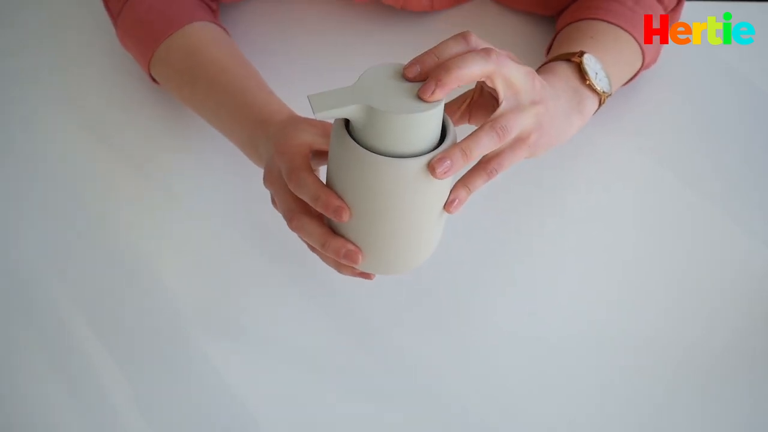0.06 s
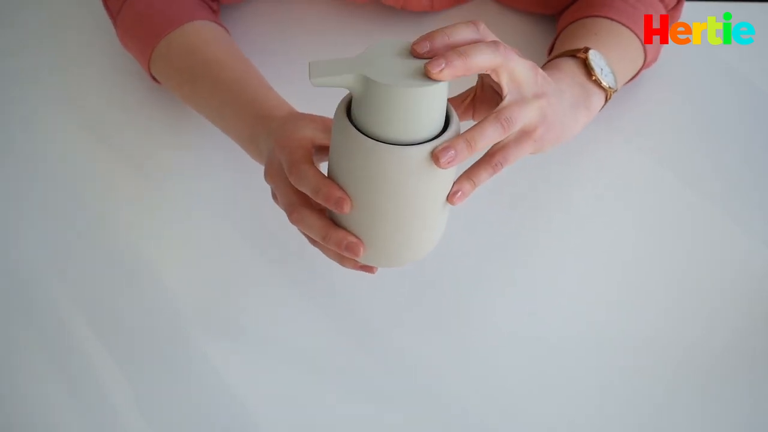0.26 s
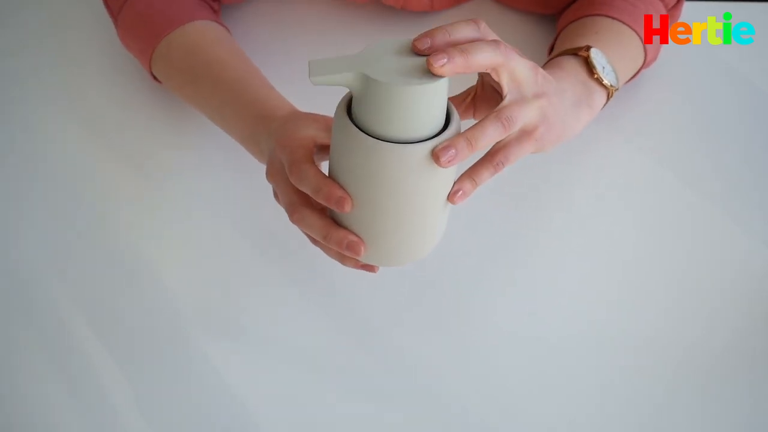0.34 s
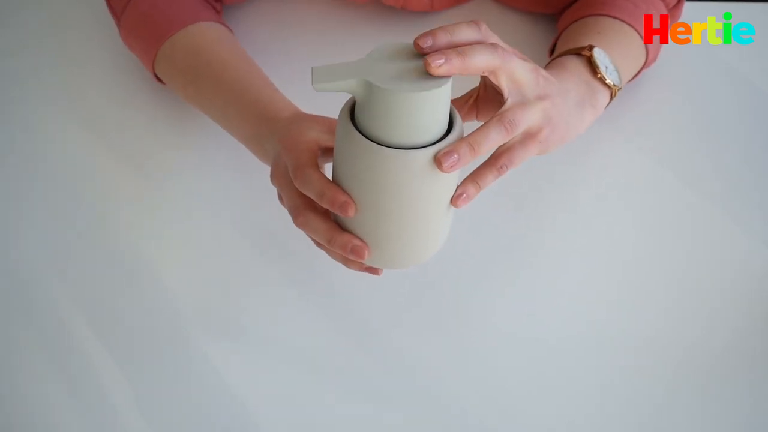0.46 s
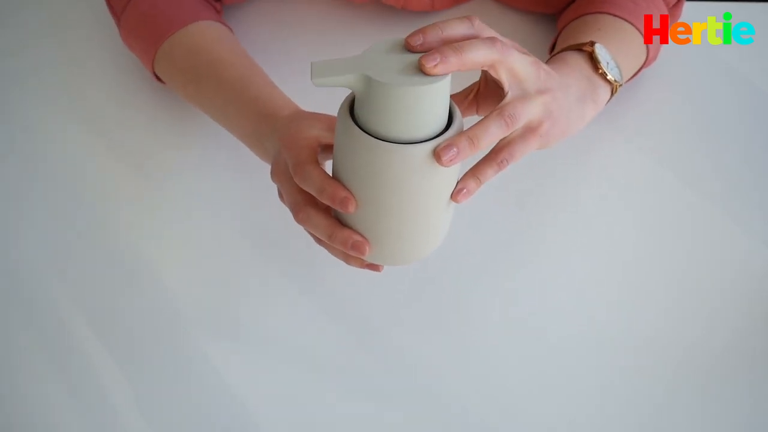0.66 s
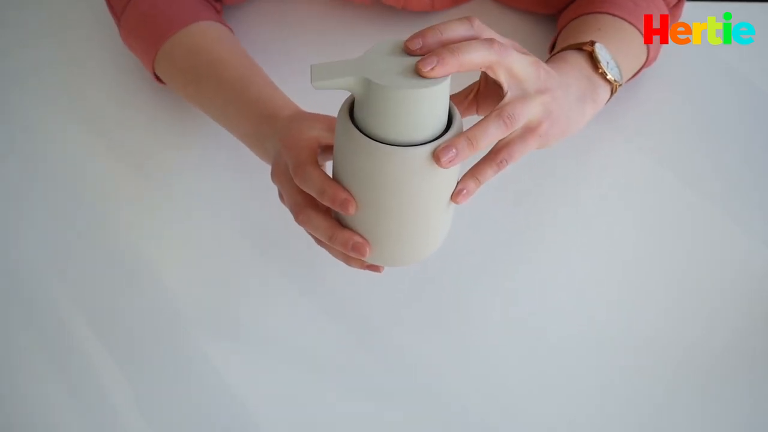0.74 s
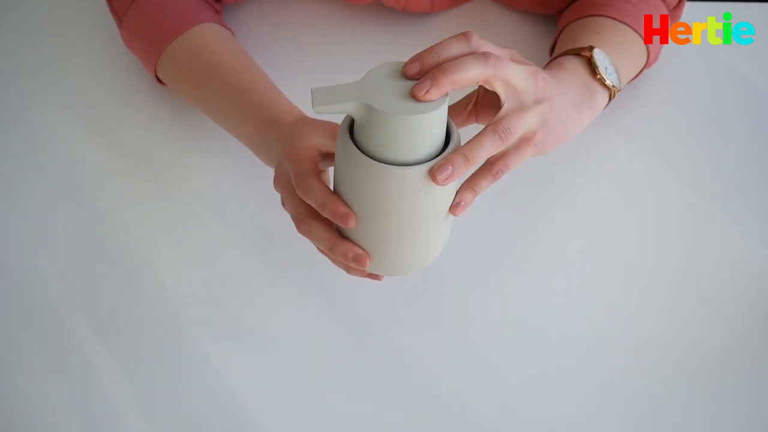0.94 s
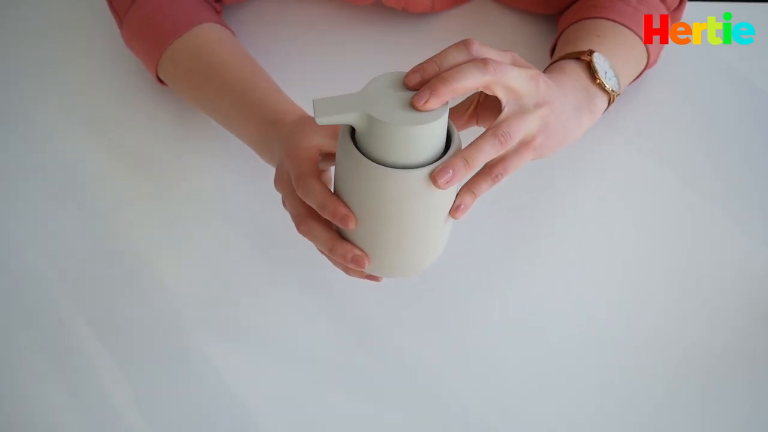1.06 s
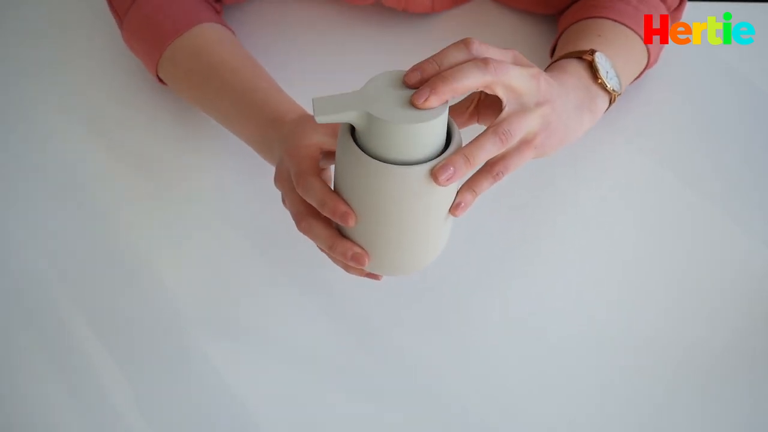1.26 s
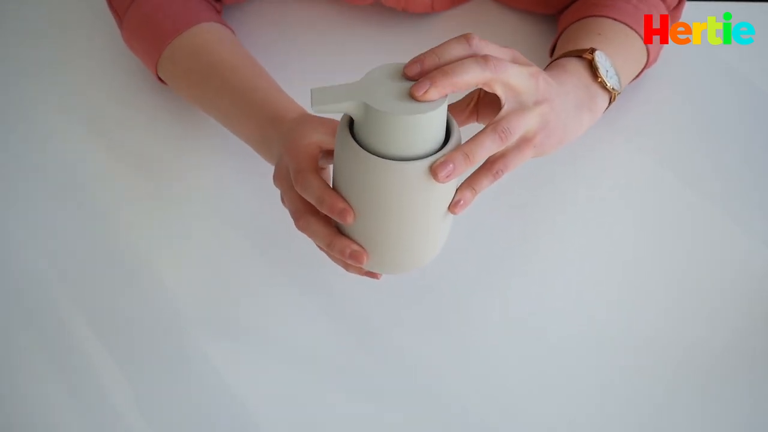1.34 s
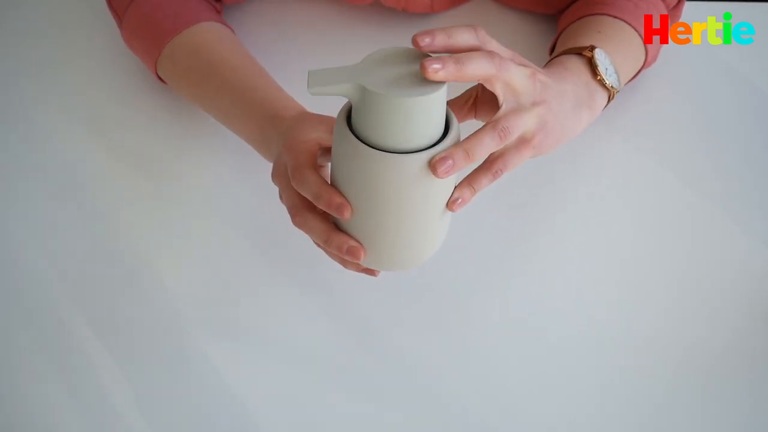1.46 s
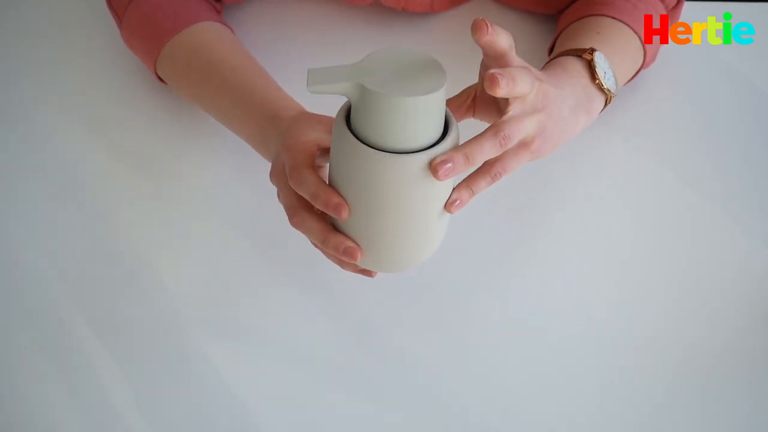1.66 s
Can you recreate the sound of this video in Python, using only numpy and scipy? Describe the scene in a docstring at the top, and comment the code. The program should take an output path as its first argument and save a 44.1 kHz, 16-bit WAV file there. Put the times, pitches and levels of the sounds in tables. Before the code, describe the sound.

A soap dispenser pump slides up with a faint squeak and clacks sharply. It is pressed down again, rubbing and bumping softly on the table, then springs back with a second clack, close up in a quiet room.

```python
"""A soap dispenser on a table in a quiet room, close to a single microphone. Over faint hiss and the
rumble of the hand, a press dies away. The plastic head rubs and squeaks up its collar, the hollow under
it rising in pitch, until the spring throws it against its stop with a sharp clack at 0.24 s. Near 0.9 s
it is pressed down again, rubbing, while the hand bumps the dispenser softly on the table. It lifts and
clacks once more at 1.39 s, and the room answers."""
import sys
import numpy as np
from scipy import signal
from scipy.fft import rfft, irfft, next_fast_len
from scipy.io import wavfile

SR = 44100
rng = np.random.default_rng(int(sys.argv[2]) if len(sys.argv) > 2 else 0)


def materialize(psi):
    """Save the field psi as 16-bit PCM at rate SR to the path in sys.argv[1].

    A 1-D psi becomes a single channel; in a 2-D psi each row is a channel.
    """
    bounded = np.clip(np.atleast_2d(psi).T, -1, 1)
    quanta = np.round(bounded * 32767).astype(np.int16)
    wavfile.write(sys.argv[1], SR, quanta)


N = 74970
T = np.arange(N) / SR
SIZE = next_fast_len(2 * N)
HZ = np.fft.rfftfreq(SIZE, 1 / SR)


def amp(db):
    """Decibels to gain."""
    return 10 ** (np.asarray(db) / 20)


def unit(x):
    """Scale to rms 1."""
    return x / np.sqrt(np.mean(x ** 2) + 1e-20)


def along(points, hz):
    """Read (Hz, value) points on a log axis."""
    freqs, values = np.transpose(points)
    return np.interp(np.log(hz + 1), np.log(freqs + 1), values)


def level(rows, release_s=.0006):
    """Gain per sample from (s, dB) rows, falling 20 dB per release_s after the last."""
    s, db = np.transpose(rows)
    return amp(np.interp(T, s, db) - 20 * np.maximum(T - s[-1], 0) / release_s) * (T >= s[0])


def filtered(x, response):
    """x through a frequency response."""
    return irfft(rfft(x, SIZE) * response, SIZE)[:N]


def noise(spectrum):
    """Noise of rms 1, coloured by (Hz, dB) points."""
    return unit(filtered(rng.standard_normal(N), amp(along(spectrum, HZ))))


def impulse(db):
    """The causal click that has this spectrum."""
    cepstrum = irfft(np.log(amp(db)), SIZE)
    cepstrum[1:SIZE // 2] *= 2
    cepstrum[SIZE // 2 + 1:] = 0
    return irfft(np.exp(rfft(cepstrum)), SIZE)[:N]


def ring(modes, attack_s):
    """Damped sines that start together."""
    sines = sum(amp(db - 60 * T / t60) * np.sin(2 * np.pi * hz * T) for hz, db, t60 in modes)
    return (1 - np.exp(-T / attack_s)) * sines


def at(s, x):
    """x, starting s seconds later."""
    return np.pad(x, (max(round(s * SR), 0), 0))[:N]


# The quiet behind the dispenser. Each row: frequency in Hz, relative level in dB.
FLOOR_SPECTRUM = [(20, 24), (80, 21), (250, 12.5), (500, 7), (1000, 1), (3000, -4), (8000, -7.5),
                  (15000, -7.5)]

def noise_floor(level_db=-66):
    """Faint steady hiss, strongest in the bass."""
    return amp(level_db) * noise(FLOOR_SPECTRUM)


# The hand near the microphone, holding and shifting its grip. Each row: time in seconds, level in dB.
HOLD_LEVELS = [(0, -67), (0.4, -67), (0.6, -64.5), (0.85, -71.5), (1.0, -57), (1.15, -59.5), (1.27, -70.5),
               (1.7, -62)]
GRIP_LEVELS = [(0.42, -72), (0.48, -62), (0.62, -56), (0.68, -75.5)]
# Colour of the holding hand's rumble. Each row: frequency in Hz, relative level in dB.
HOLD_SPECTRUM = [(20, -3), (45, -9.5), (70, -3), (90, -1.5), (122, 1.5), (148, -4.5), (188, 3), (260, -12),
                 (315, -5.5), (500, -22), (1000, -32.5), (3000, -52.5)]

def handling():
    """The hand rumbles on the dispenser, deeper as it shifts its grip."""
    hold = level(HOLD_LEVELS) * noise(HOLD_SPECTRUM)
    grip = level(GRIP_LEVELS) * noise([(15, 5.5), (32, -2.5), (60, 1), (150, -36), (1000, -80)])
    return hold + grip


# The hollow under the head, low when pressed. Each row: time in seconds, pitch in Hz.
HOLLOW_PITCH = [(0, 898), (0.17, 879.3), (0.2, 917), (0.238, 1123), (0.89, 1130), (0.98, 1089), (1.06, 980),
                (1.13, 870), (1.35, 910), (1.375, 930), (1.394, 1078)]
HOLLOW_LOWPASS = 1 / (1 + (HZ / 1800) ** 4)

def hollow(x, width_hz=58):
    """x through the resonance under the head, which follows the head's height."""
    pitch_hz = np.interp(T, *np.transpose(HOLLOW_PITCH))
    turn = np.exp(2j * np.pi * np.cumsum(pitch_hz) / SR)
    pole = np.exp(-np.pi * width_hz / SR)
    return (signal.lfilter([1], [1, -pole], x / turn) * turn).real


# The head's four strokes, heard close up. Each row: time in seconds, relative level in dB.
PRESS_1 = [(0, -71.5), (0.03, -74), (0.06, -90)]
RISE_1 = [(0.168, -78), (0.181, -55), (0.19, -49.5), (0.2, -49.5), (0.209, -55), (0.217, -42), (0.223, -43),
          (0.229, -45), (0.238, -46.5)]
PRESS_2 = [(0.875, -79), (0.895, -49.5), (0.913, -66.5), (0.943, -55.5), (0.957, -68), (0.971, -50),
           (0.987, -64), (1.001, -54), (1.009, -60), (1.041, -52), (1.071, -60), (1.125, -60.5),
           (1.16, -86)]
RISE_2 = [(1.318, -79), (1.333, -47.5), (1.341, -50.5), (1.352, -54.5), (1.36, -68.5), (1.366, -45.5),
          (1.377, -40.5), (1.388, -42), (1.394, -44.5)]
# Colour of the rubbing, down and up. Each row: frequency in Hz, relative level in dB.
PRESS_SPECTRUM = [(200, -11.5), (700, -8.5), (1380, 5.5), (1680, -5.5), (2100, -1), (2600, -3.5), (3250, 6),
                  (3800, -5.5), (4700, 0.5), (5600, 2), (7200, -2.5), (8400, -15), (10000, -11.5),
                  (13500, -19), (15500, -22.5)]
RISE_SPECTRUM = [(200, -17), (600, -11), (1350, -0.5), (1700, -6.5), (2500, -4.5), (3050, 4), (3700, -1.5),
                 (4800, 0.5), (5700, -3), (7000, -2), (8300, -12.5), (10000, -10), (13500, -15.5),
                 (15500, -23)]
# The collar's resonances on the way up. Each row: centre in Hz, width in Hz, boost in dB.
COLLAR_PEAKS = [(3010, 270, 4), (3245, 360, 4), (5600, 200, 11), (6200, 390, 6.5), (6340, 200, 5.5)]

def rubbing(slips_per_s=12000, spread=.22):
    """Dense tiny slips hiss in the collar and sound the hollow, which is more damped on the way down."""
    slips = (rng.random(N) < slips_per_s / SR) * rng.standard_normal(N)
    slips *= np.exp(spread * rng.standard_normal(N))
    press = level(PRESS_1) + level(PRESS_2)
    rise = level(RISE_1, release_s=.008) + level(RISE_2, release_s=.008)
    collar_db = sum(db / (1 + (2 * (HZ - hz) / width) ** 2) for hz, width, db in COLLAR_PEAKS)
    hiss = press * unit(filtered(slips, amp(along(PRESS_SPECTRUM, HZ))))
    hiss += rise * unit(filtered(slips, amp(along(RISE_SPECTRUM, HZ) + collar_db)))
    tone = amp(-2.5) * press * unit(hollow(slips, width_hz=125))
    tone += amp(.5) * rise * unit(hollow(slips))
    return amp(-2) * hiss + filtered(tone, HOLLOW_LOWPASS)


# Bumps on the table. Each row: start in seconds, relative level in dB, half the low-pass corner in Hz.
BUMPS = [(0.189, -48, 307), (0.417, -32, 153), (0.906, -33.5, 516), (0.9159, -34, 337), (0.956, -38.5, 406),
         (1.337, -49.5, 403), (1.361, -53.5, 150)]
# The room's low boom after each bump.
# Each row: frequency in Hz, relative level in dB, seconds to fall 60 dB.
BOOM_MODES = [(97, -5, .19), (118, 2.5, .17), (190.5, -4, 0.17), (212.7, -3, 0.23), (292.5, -4.5, 0.19),
              (314.5, -7.5, 0.15), (347, -9, .18), (473.6, -10, 0.14), (560, -14.5, 0.15)]
# The dull thud of contact. Each row: frequency in Hz, relative level in dB.
THUD_SPECTRUM = [(30, -25.5), (60, -14), (110, -1.5), (700, 0), (2000, -13), (8000, -29)]

def bumps(thud_db=-9, thud_t60_s=.08):
    """The hand knocks the dispenser softly and a low boom follows."""
    boom = ring(BOOM_MODES, attack_s=.006)
    out = np.zeros(N)
    for s, db, half_corner_hz in BUMPS:
        thud = amp(thud_db - 60 * T / thud_t60_s) * noise(THUD_SPECTRUM)
        softening = 1 / (1 + 1j * HZ / (2 * half_corner_hz)) ** 2
        out += at(s, amp(db) * filtered(boom + thud, softening))
    return out


# Squeaks, faint even this close. Each row: start in seconds, length in seconds.
SQUEAKS = [(0.19, .04), (1.338, 0.03)]

def squeaks(pitch_hz=2960, half_width_hz=70, level_db=-54.5):
    """The collar sings a thin note as the head starts to slide up."""
    band = 1 / (1 + ((HZ - pitch_hz) / half_width_hz) ** 2)
    note = unit(filtered(rng.standard_normal(N), band))
    swells = sum(np.sin(np.pi * np.clip((T - s) / length, 0, 1)) for s, length in SQUEAKS)
    return amp(level_db) * note * swells


# Catches in the collar, and the head settling against its stop just after the second clack. Each row: start in
# seconds, kick to the hollow in dB, snap level in dB.
TICKS = [(0.194, -32, -53.5), (0.2166, -36, -46), (0.894, -61.5, -49), (0.897, -38, -49),
         (0.972, -42.5, -49), (1.277, -92, -54.5), (1.342, -30.5, -59), (1.381, -31, -33.5),
         (1.41, -55, -31), (1.421, -47, -34.5)]
# The plastic's snap, in ticks and clacks alike. Each row: frequency in Hz, relative level in dB.
SNAP_SPECTRUM = [(300, -13), (1500, -8.5), (2500, -3), (3500, 1.5), (4800, -3.5), (6000, -4), (8500, -17.5),
                 (14000, -21.5), (16000, -36.5)]

def ticks(snap_t60_s=.016):
    """The head catches or settles lightly: a small snap and a ping of the hollow."""
    kicks = sum(at(s, amp(db) * (T == 0)) for s, db, _ in TICKS)
    onset = 1 - np.exp(-T / .001)
    snaps = sum(at(s, onset * amp(db - 60 * T / snap_t60_s) * noise(SNAP_SPECTRUM)) for s, _, db in TICKS)
    return filtered(hollow(kicks), HOLLOW_LOWPASS) + snaps


# The loudest sounds at the microphone. Each row: start in seconds, gain in dB, treble gain in dB.
CLACKS = [(0.2381, 1, -5), (1.3945, 1, -6)]
# The head's ring, and the spring's long, faintly beating one.
# Each row: frequency in Hz, relative level in dB, seconds to fall 60 dB.
HEAD_MODES = [(420, -30.5, 0.016), (1135, -2.5, 0.022), (1324.5, -8.5, .022), (1401, -26.5, 0.045),
              (1893, -53, 0.41), (3132, -36.5, .05), (3350, -53.5, .36), (4345, -56.5, .25),
              (5640, -45, .025)]
SPRING_MODES = [(1153, -36, .68), (1185, -42, .6)]
# The click of plastic on plastic. Each row: frequency in Hz, relative level in dB.
CLICK_SPECTRUM = [(40, -7.5), (150, 2), (280, 9.5), (420, 0.5), (1700, -4), (2400, 8), (3150, 9), (4100, 6),
                  (5000, -10.5), (6500, 0.5), (8200, -20.5), (14000, -24.5), (16000, -45.5)]

def clacks(knock_hz=1022.8, knock_peak_s=.0012, steepness=7.62, crack_t60_s=.02):
    """The head slams into its stop: a two-cycle knock, a click and a crack, then head and spring ring."""
    age = T / knock_peak_s
    knock = amp(-.5) * (age * np.exp(1 - age)) ** steepness * np.sin(2 * np.pi * knock_hz * T)
    body = -knock - ring([*HEAD_MODES, *SPRING_MODES], attack_s=.0005)
    click = impulse(along(CLICK_SPECTRUM, HZ))
    out = np.zeros(N)
    for s, db, treble_db in CLACKS:
        crack = amp(-21.5 - 60 * T / crack_t60_s) * noise(SNAP_SPECTRUM)
        treble = amp(treble_db) * at(.0005, click + crack)
        out += amp(db) * at(s, body + treble)
    return out


# The room's decay around the table. Each row: frequency in Hz, seconds to fall 60 dB.
ROOM_T60 = [(100, 0.54), (400, .55), (1100, 0.47), (2200, 0.6), (3600, .52), (6000, 0.41), (12000, 0.21)]
# Colour of that decay. Each row: frequency in Hz, relative level in dB.
ROOM_COLOUR = [(100, 1), (280, 9.5), (390, 4), (550, -9), (850, -8.5), (1130, 1.5), (1450, -8.5),
               (1900, -6), (2200, -14.5), (2700, -9), (3300, 0.5), (4200, 0.5), (6000, -5.5), (12000, -4.5)]
# Wall echoes reaching the microphone. Each row: delay in seconds, gain of the lows in dB.
WALL_ECHOES = [(.0037, -19.5), (.0205, -25.5), (0.061, -27.5), (.089, -31.5)]

def room(x, tail_db=-13, echo_corner_hz=2500):
    """The room answers with a few dull echoes and a diffuse tail in which the high treble dies first."""
    hz, t, bands = signal.stft(rng.standard_normal(SR), SR, nperseg=256)
    decay = amp(-60 * t / along(ROOM_T60, hz)[:, None])
    tail = signal.istft(bands * decay, SR, nperseg=256)[1][:SR]
    tail *= 1 - np.exp(-T[:SR] / .005)
    diffuse = signal.fftconvolve(x, tail / np.linalg.norm(tail))[:N]
    diffuse = filtered(diffuse, amp(tail_db + along(ROOM_COLOUR, HZ)))
    echoes = sum(at(s, amp(db) * x) for s, db in WALL_ECHOES)
    return diffuse + filtered(echoes, 1 / (1 + (HZ / echo_corner_hz) ** 2))


def scene():
    """The dispenser close up in its room, in mono, over handling rumble and faint hiss."""
    pump = clacks() + rubbing() + ticks() + squeaks()
    bumping = bumps()
    hand = handling()
    reverb = room(pump + amp(-5.5) * bumping)
    return (pump + bumping + reverb + hand + noise_floor())[None]


def record(dry, ceiling=.98, top_hz=15800):
    """The clacks just clip the microphone's channel, and nothing is kept above the band limit."""
    return filtered(np.clip(dry[0], -ceiling, ceiling), HZ < top_hz)[None]


dry = scene()
out = record(dry)
materialize(out)
```